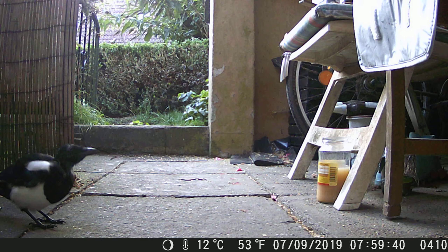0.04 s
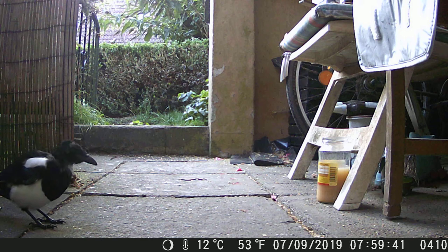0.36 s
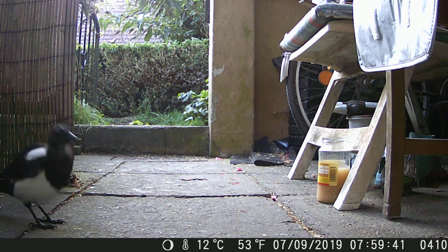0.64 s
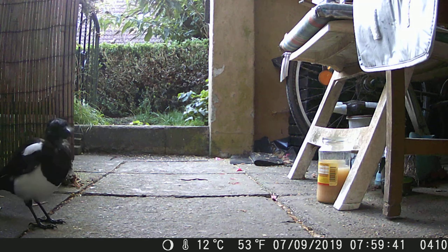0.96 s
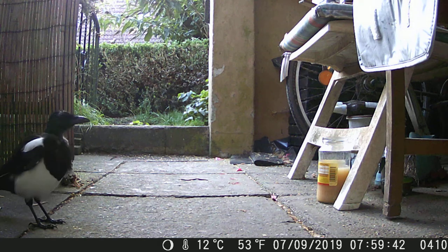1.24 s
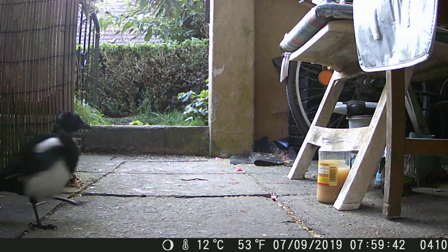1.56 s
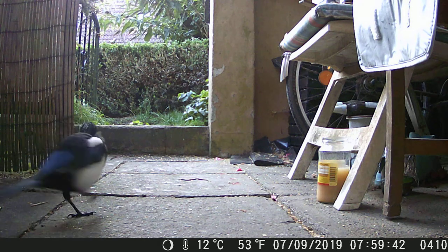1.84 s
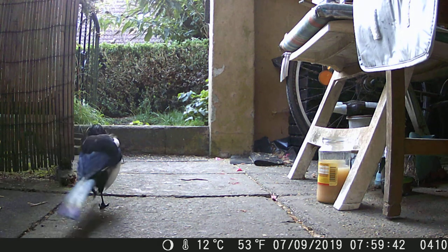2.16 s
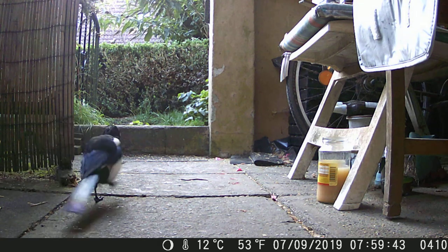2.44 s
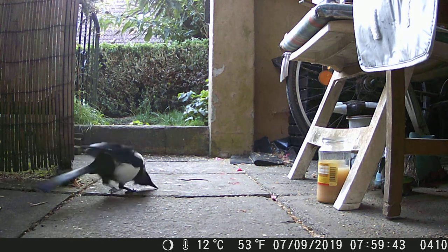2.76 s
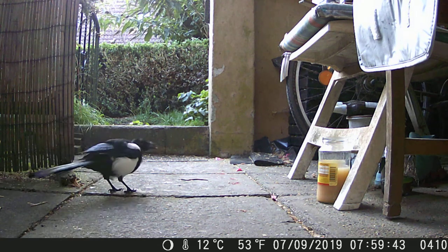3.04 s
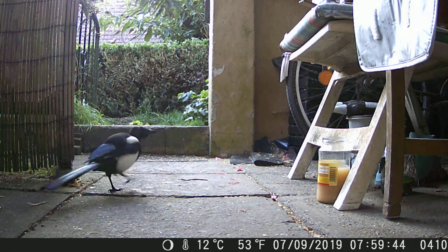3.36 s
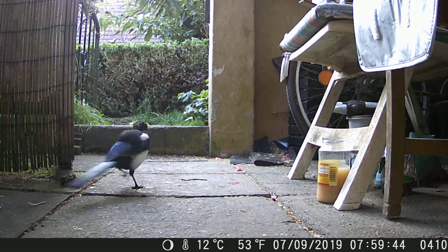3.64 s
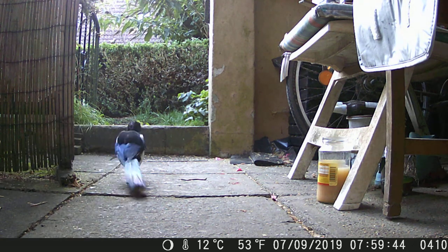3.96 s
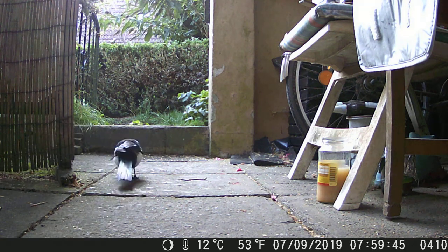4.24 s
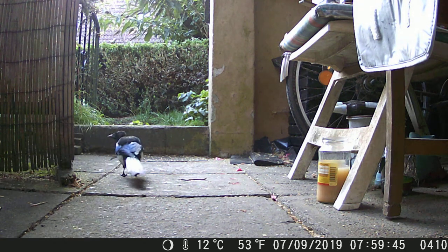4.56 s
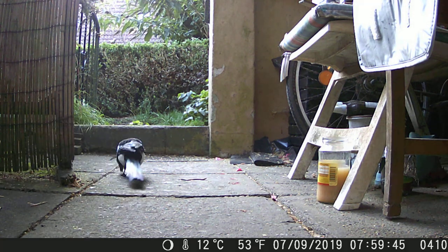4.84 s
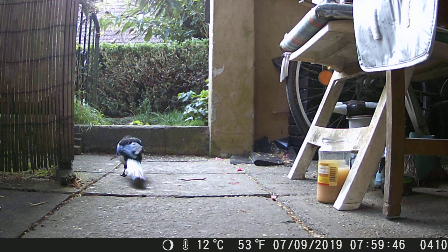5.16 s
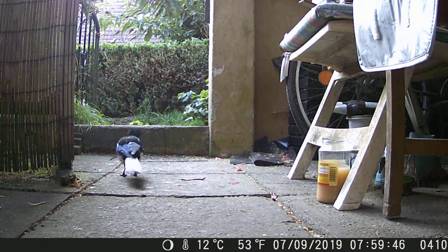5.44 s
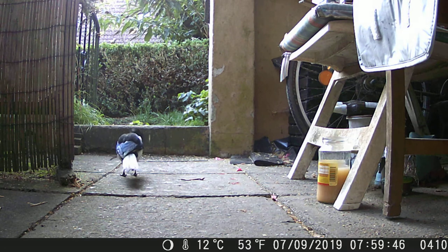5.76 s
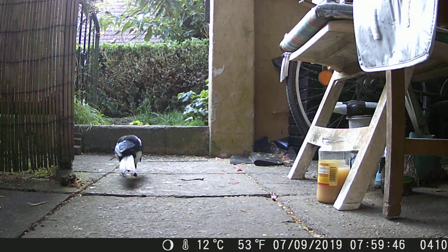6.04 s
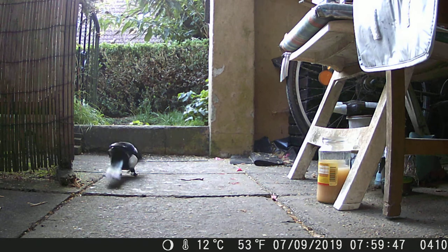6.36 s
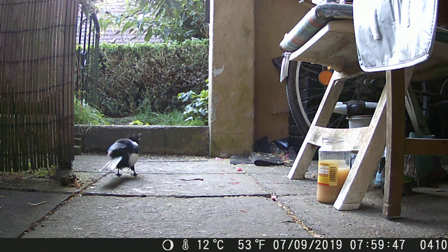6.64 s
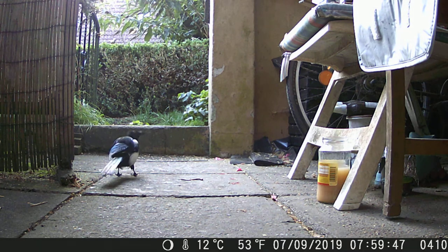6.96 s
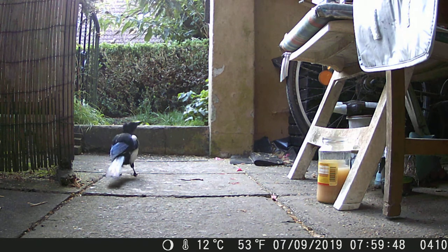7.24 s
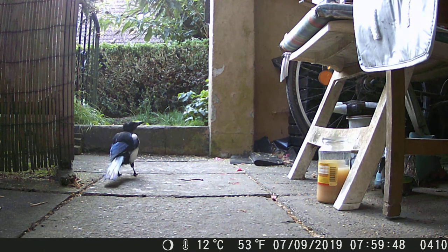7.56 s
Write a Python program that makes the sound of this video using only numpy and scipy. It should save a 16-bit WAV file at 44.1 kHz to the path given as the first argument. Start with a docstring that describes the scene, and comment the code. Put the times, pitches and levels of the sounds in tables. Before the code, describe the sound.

Quiet patio ambience of low rumble, hum and thin hiss, opening with a pop and carrying a faint, regular electrical pulsing.

```python
"""Trail camera waking on a quiet patio.

The microphone switches on with a pop, then hisses over a low outdoor rumble and hum.
The camera's work loads its supply five times a second, which leaks into the sound as a soft
flutter, with a firmer bump every two seconds. One tiny tick is heard where the sound skips."""
import sys
import numpy as np
from scipy import signal
from scipy.fft import rfft, irfft
from scipy.io import wavfile
from scipy.ndimage import uniform_filter1d

SR = 44100
rng = np.random.default_rng(int(sys.argv[2]) if len(sys.argv) > 2 else 0)


def to_wav(s):
    """Save 16-bit WAV."""
    ch = np.atleast_2d(s).T  # columns
    pcm = np.round(np.clip(ch, -1, 1) * 32767)  # PCM
    wavfile.write(sys.argv[1], SR, pcm.astype(np.int16))


N = 335160
WAKE_S, TICK_S = .0726, 6.4914


def undb(db):
    """Decibels to gain."""
    return 10 ** (np.asarray(db) / 20)


def times():
    """Sample times in s."""
    return np.arange(N) / SR


def lowpass(x, hz):
    """One-pole RC low-pass."""
    pole = np.exp(-2 * np.pi * hz / SR)
    return signal.lfilter([1 - pole], [1, -pole], x)


def noise(spectrum):
    """Noise shaped by rows of freq_hz, density_db_per_hz."""
    hz, db = np.transpose(spectrum)
    log_hz = np.log(np.maximum(np.fft.rfftfreq(N, 1 / SR), 1))
    gain = undb(np.interp(log_hz, np.log(hz), db))
    return irfft(rfft(rng.standard_normal(N)) * gain, N) * np.sqrt(SR / 2)


def walk(rate_hz):
    """Smooth random drift, unit spread."""
    hold = int(SR / rate_hz)
    held = np.repeat(rng.standard_normal(N // hold + 1), hold)
    smooth = uniform_filter1d(uniform_filter1d(held, hold), hold)[:N]
    return smooth / smooth.std()


def gates(rows):
    """Rectangular pulses from rows of start_s, length_s, level_db."""
    pulses = np.zeros(N)
    for start_s, length_s, level_db in rows:
        pulses[int(start_s * SR):int((start_s + length_s) * SR)] += undb(level_db)
    return pulses


def tone(pitch_hz, rms_db, waver_hz):
    """Sine with wandering pitch."""
    phase = 2 * np.pi * np.cumsum(pitch_hz + waver_hz * walk(2.5)) / SR
    return np.sqrt(2) * undb(rms_db) * np.sin(phase)


def outdoors(sway_db=.15, drone_hz=68, drone_db=-64, drone_end_s=1.3, fade_s=.33):
    """Near-steady rumble, beating low tones and a deep drone that soon fades."""
    # distant rumble: freq_hz, density_db_per_hz
    rumble_spectrum = [(20, -76.5), (45, -77.0), (85, -85), (140, -93.5), (180, -96.5), (240, -98.5),
                       (400, -105.1), (700, -108.6), (1050, -110.3), (1500, -113.1), (2700, -118.3),
                       (4000, -124.0), (5200, -131.0), (9000, -152.0)]
    # far machinery and mains hum: pitch_hz, rms_db
    hum_tones = [(100, -71.5), (109, -71), (114, -70), (213.5, -88)]
    rumble = noise(rumble_spectrum) * undb(sway_db * walk(3))
    hum = sum(tone(hz, db, waver_hz=.35) for hz, db in hum_tones)
    fade = np.clip((drone_end_s - times()) / fade_s, 0, 1)
    return rumble + hum + fade * tone(drone_hz, drone_db, waver_hz=1.8)


def hiss():
    """Self-noise of the microphone and its converter."""
    # noise floor: freq_hz, density_db_per_hz
    hiss_spectrum = [(4000, -133.1), (5200, -129.8), (6300, -125.8), (7200, -123.0), (7800, -126.5),
                     (8300, -133.5), (8800, -146), (9500, -165)]
    return noise(hiss_spectrum)


def tick(peak_db=-55, corner_hz=1100):
    """One tiny, bright click where the sound skips."""
    age_s = times() - TICK_S
    return undb(peak_db) * (age_s >= 0) * np.exp(-2 * np.pi * corner_hz * np.abs(age_s))


def supply_load(first_s=.2745, period_s=.2, slot_s=.0228, skip_s=.03):
    """One load pulse per work cycle; each waits for the next slot, so the beat limps."""
    due_s = np.arange(first_s, N / SR, period_s)
    slotted_s = WAKE_S + slot_s * np.ceil((due_s - WAKE_S) / slot_s)
    slotted_s -= skip_s * (due_s > TICK_S)  # beat comes earlier after the tick
    late, longer, heavier = rng.standard_normal((len(due_s), 3)).T
    start_s = slotted_s + .002 * late
    length_s = .04 + .008 * longer
    load_db = -46.5 + 1.6 * heavier
    return gates(zip(start_s, length_s, load_db))


def flutter(settle_s=.0066, smooth_hz=27, round_hz=170, kick_gain_db=7.5, swell_hz=40):
    """The supply kicks one way as a load starts, back as it ends, and rustles in between."""
    # supply rustle under load: freq_hz, density_db_per_hz
    rustle_spectrum = [(50, -90), (110, -82), (180, -90), (330, -101), (700, -115), (3000, -132),
                       (9000, -165)]
    load = supply_load()
    swing = load - np.interp(times() - settle_s, times(), load)  # regulator lags each step
    kicks = undb(kick_gain_db) * lowpass(lowpass(swing, smooth_hz), round_hz)
    rustle = noise(rustle_spectrum) * lowpass(load > 0, swell_hz)
    return kicks + rustle


def bumps(draw_s=.0049, smooth_hz=50, recover_hz=9):
    """Each heavy draw charges and drains a capacitor: a shark-fin pulse, then a shallow undershoot."""
    # short, heavy current draws: start_s, load_db
    draws = [(0.131, -34), (2.1335, -31), (4.1397, -32), (6.141, -32)]
    load = gates((start_s, draw_s, load_db) for start_s, load_db in draws)
    fin = lowpass(load, smooth_hz)
    return fin - lowpass(fin, recover_hz)


def wake_pop(step_db=-26.5, rise_s=.00025, drain_s=.11, snap_share=.076, ring_hz=7700, width_hz=2200):
    """Microphone bias snaps on, ramps up fast, then drains through the coupling capacitor."""
    age_s = np.maximum(times() - WAKE_S, 0)
    ramp = np.sin(np.pi / 2 * np.minimum(age_s / rise_s, 1))
    step = snap_share * (age_s > 0) + (1 - snap_share) * ramp
    pulse = step * np.exp(-age_s / drain_s)
    # input stage: resonant low-pass, rings briefly on the edge
    pole = np.exp((2j * np.pi * ring_hz - np.pi * width_hz) / SR)
    feedback = np.poly([pole, pole.conjugate()]).real
    return undb(step_db) * signal.lfilter([feedback.sum()], feedback, pulse)


def scene():
    """Silence until the microphone wakes, then the outdoors under the camera's own noises."""
    awake = times() >= WAKE_S
    steady = outdoors() + hiss() + flutter()
    return (awake * steady + bumps() + wake_pop() + tick())[None]


def record(dry, notch_hz=3230, notch_width_hz=300, notch_share=.38, top_hz=15900):
    """Camera response: a narrow dip and a steep top cut."""
    notch = signal.iirnotch(notch_hz, notch_hz / notch_width_hz, fs=SR)
    coloured = dry + notch_share * (signal.lfilter(*notch, dry) - dry)
    top_cut = signal.ellip(8, .2, 70, top_hz, fs=SR, output="sos")
    return signal.sosfilt(top_cut, coloured)


dry = scene()
out = record(dry)
to_wav(out)
```